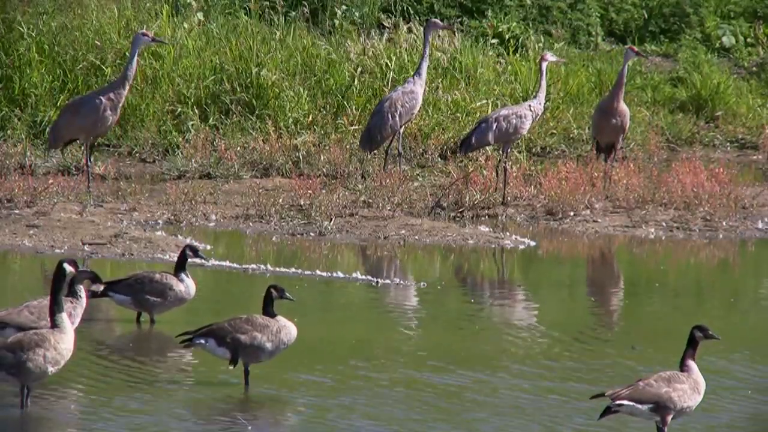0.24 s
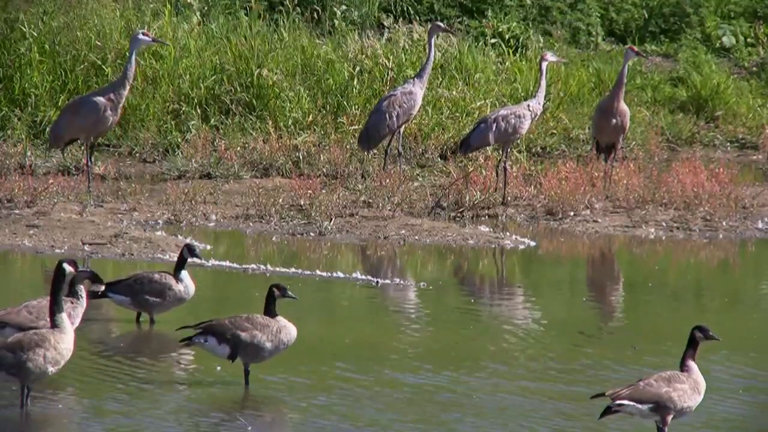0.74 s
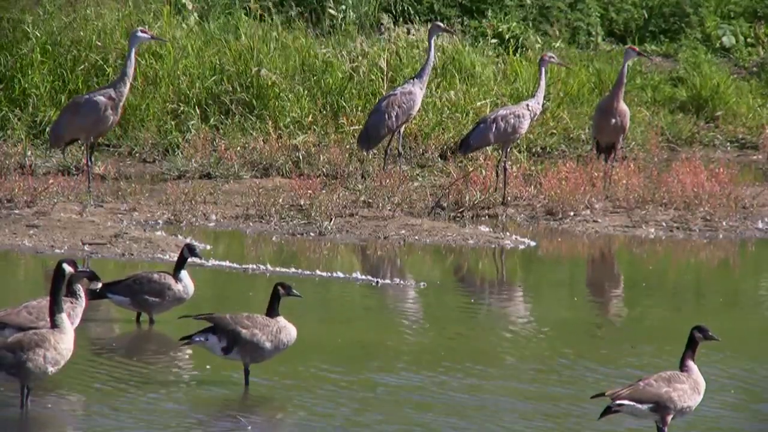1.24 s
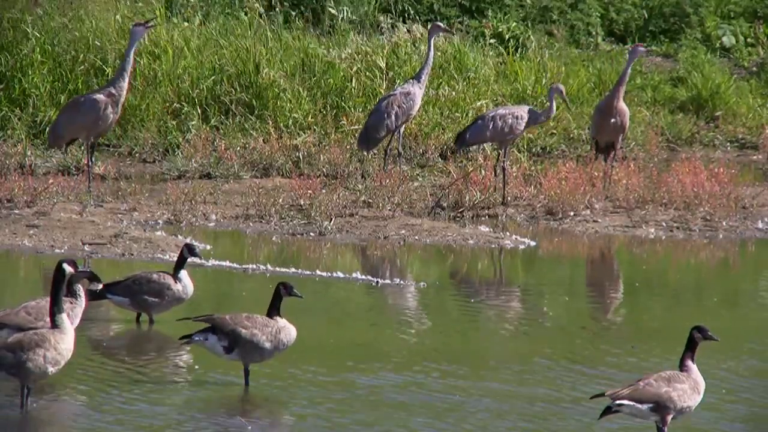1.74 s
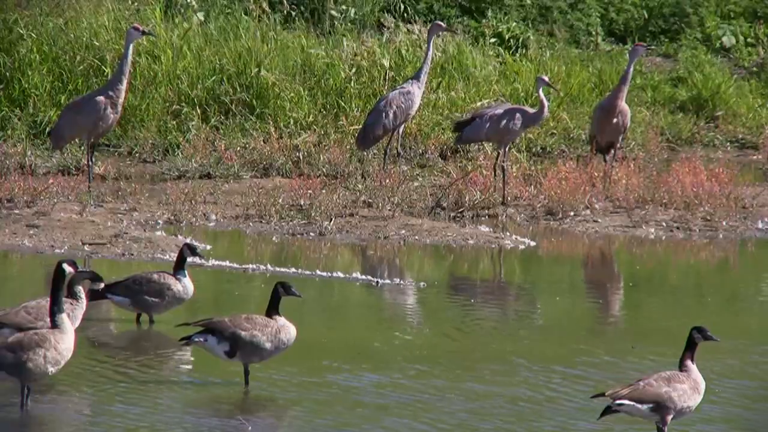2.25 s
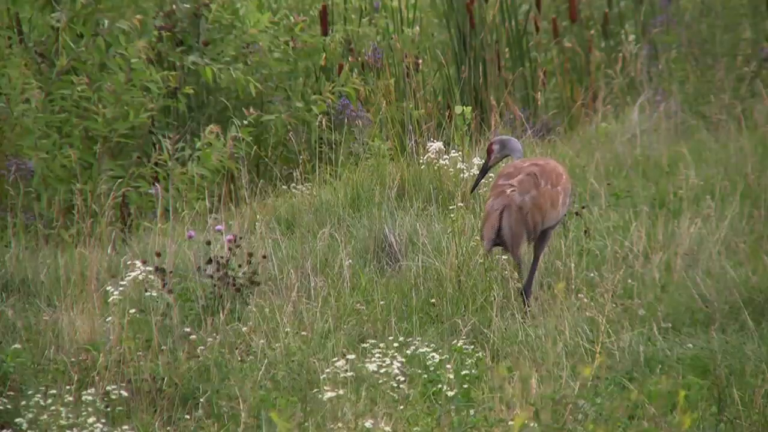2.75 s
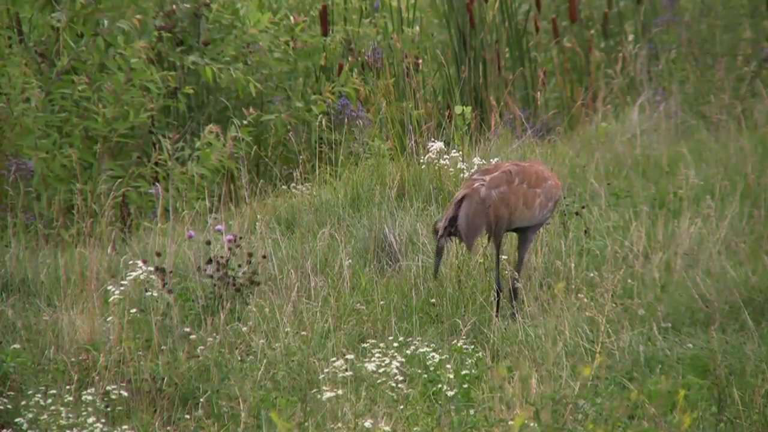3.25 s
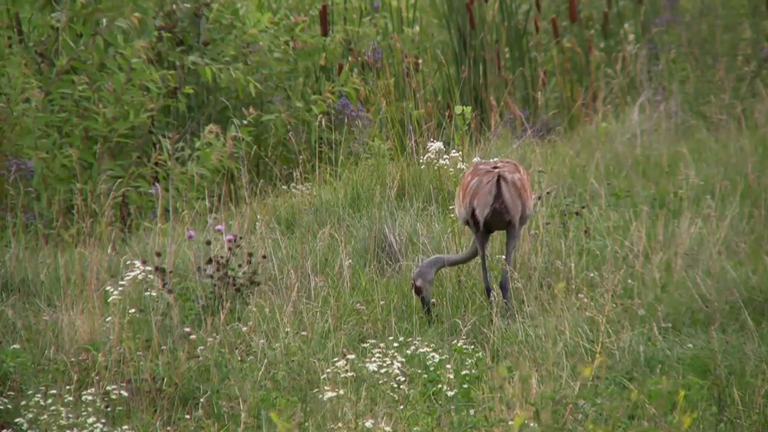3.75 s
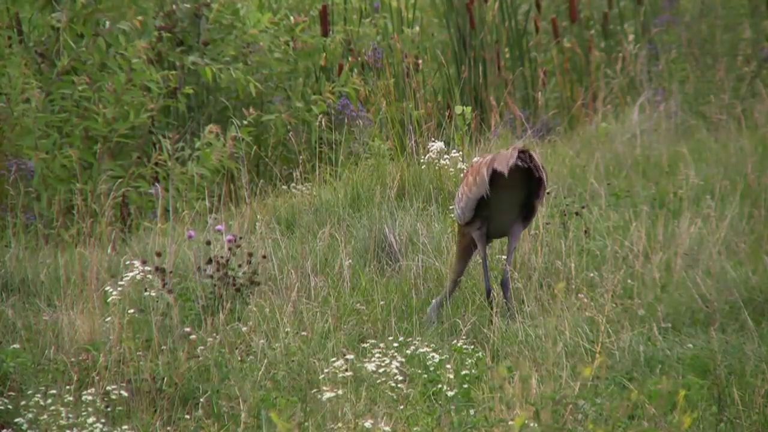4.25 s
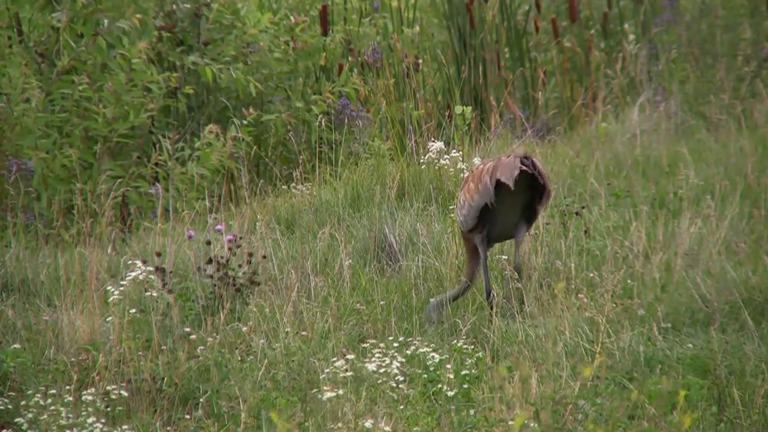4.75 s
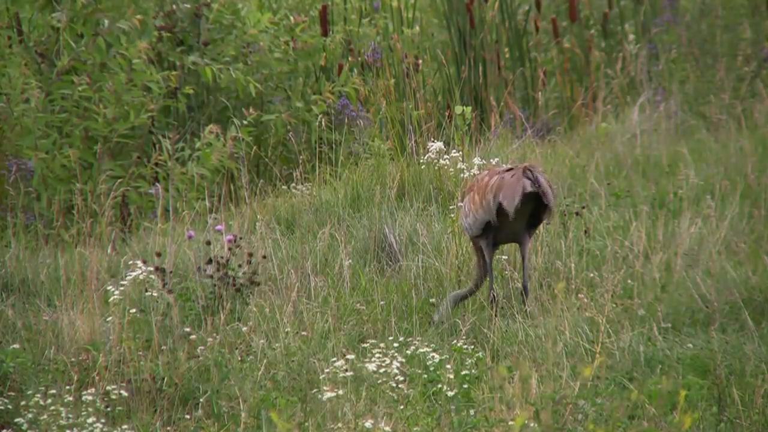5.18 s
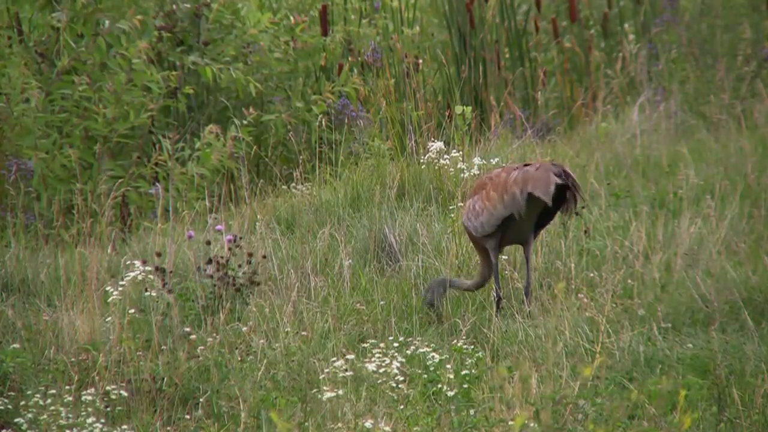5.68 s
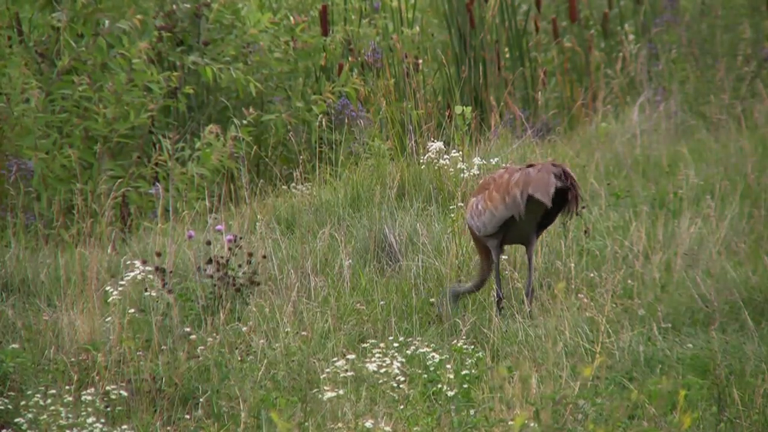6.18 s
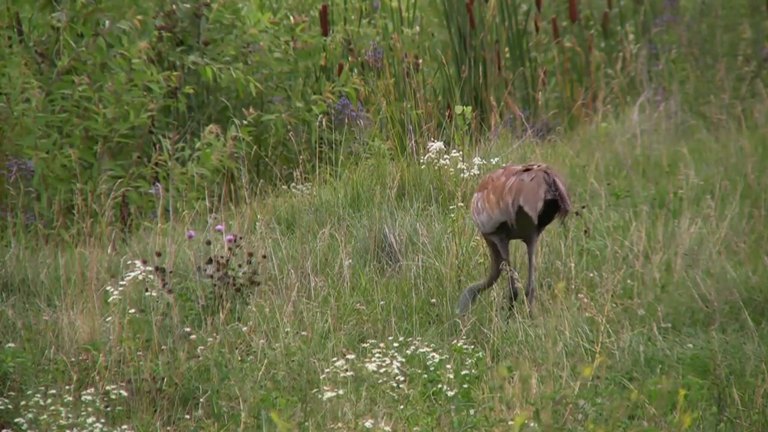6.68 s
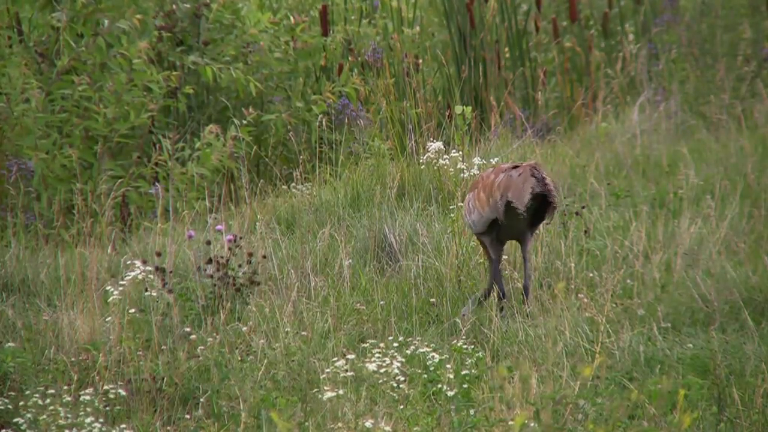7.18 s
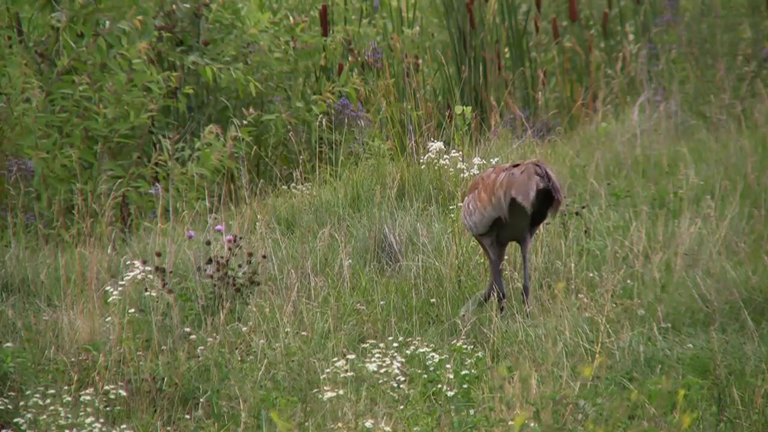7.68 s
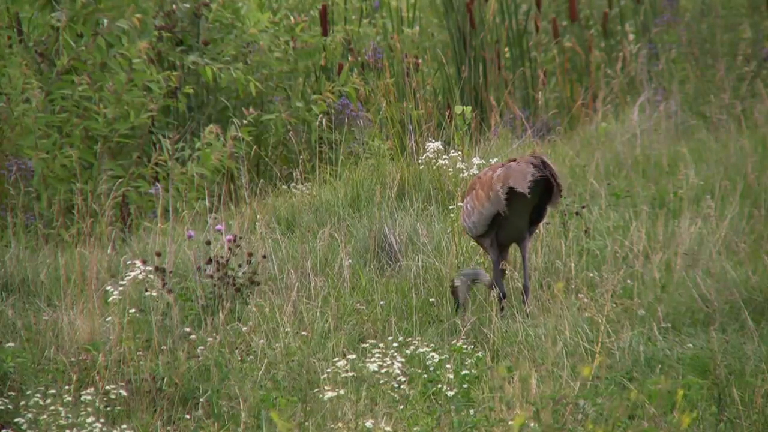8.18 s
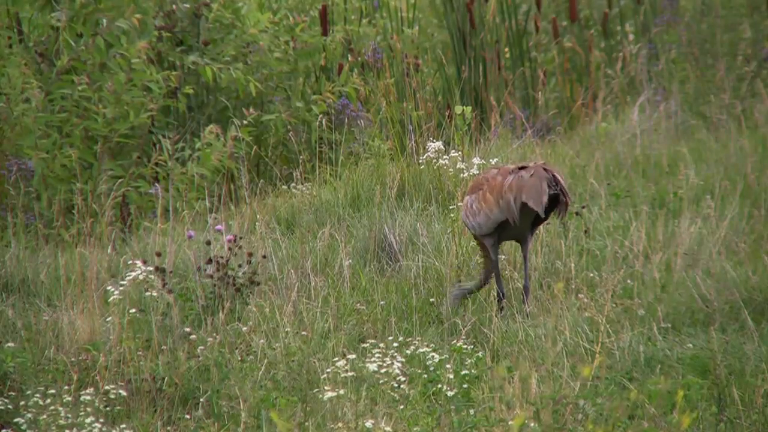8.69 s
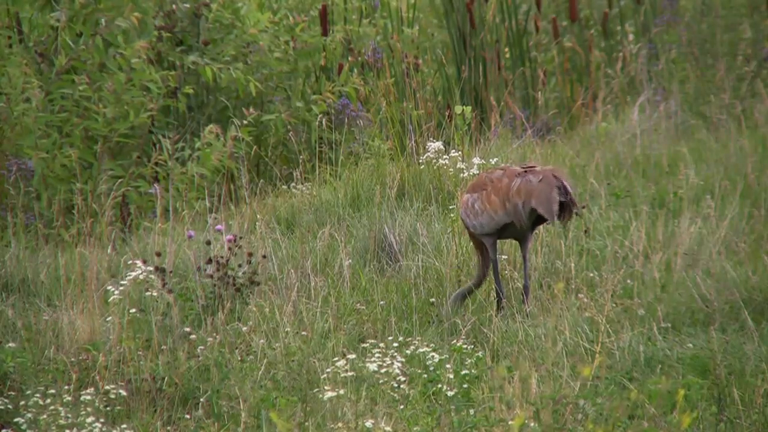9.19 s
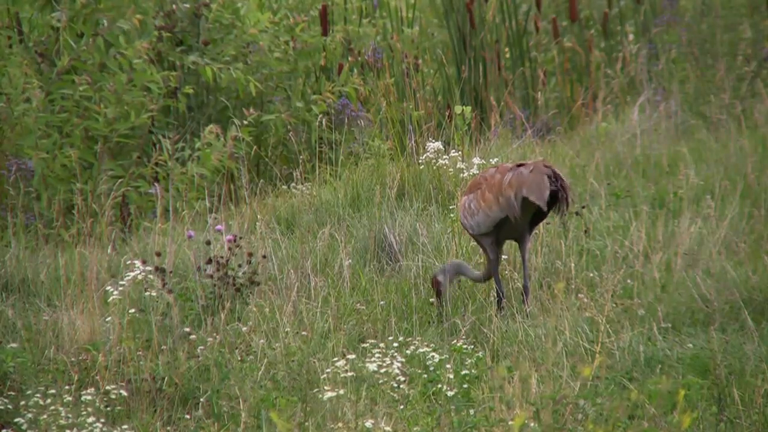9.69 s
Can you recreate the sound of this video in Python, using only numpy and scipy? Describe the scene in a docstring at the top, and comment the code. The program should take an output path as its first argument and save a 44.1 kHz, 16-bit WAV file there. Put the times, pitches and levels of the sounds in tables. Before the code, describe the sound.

Distant waterbird cries, soft wind rumble and quick bird twitters open the scene; honks then lead into a brief loud duet of rattling cranes, centred, with a slight echo off the banks. The pond sound stops suddenly. The remaining seven seconds are quieter: a katydid pulsing about eleven times a second, high insect fizz, small birds whistling, scolding and chipping left and right. Wide open-air stereo pickup in wetland grass, no water splashes.

```python
"""Crane duet with songbirds and a katydid

Two sandhill cranes rattle at a pond after far gull-like cries and honks: gliding harmonics through
a throat response, plus rasp noise. The pond layer stops at 2.6 s; a katydid pulses from 2.4 s on as
gated bright noise. Small birds twitter, whistle (gliding sines) and chip (noise bursts) on both sides
throughout, over insect hiss and far birds (patchy noise), wind, dull noise and faint thin tones."""
import sys
import numpy as np
from scipy import signal
from scipy.fft import rfft, irfft, next_fast_len
from scipy.io import wavfile
from scipy.ndimage import uniform_filter1d, map_coordinates

SR = 44100
rng = np.random.default_rng(int(sys.argv[2]) if len(sys.argv) > 2 else 0)


def transcribe(signal):
    """Save signal, clipped to [-1, 1], as a 16-bit WAV file at the path in sys.argv[1]."""
    frames = np.atleast_2d(signal).T
    limited = np.clip(frames, -1, 1)
    pcm = np.round(limited * 32767).astype(np.int16)
    wavfile.write(sys.argv[1], SR, pcm)


N = 437913
T = np.arange(N) / SR

# rasp noise of cranes and waterbirds: freq_hz, relative_db (per Hz)
RASP_SPECTRUM = [(100, -44), (250, -24.5), (480, -26), (700, -3), (1000, 6.5), (1400, -8.5), (1750, -5),
                 (2500, -13.5), (3200, -23), (5000, -27.5), (12000, -42)]
# bright rasp and fizz noise: freq_hz, relative_db (per Hz)
WING_SPECTRUM = [(5000, -24.5), (8000, -11), (10000, -10.5), (11500, -4.5), (12800, 0), (14200, -9),
                 (15800, -14.5)]


def amp(db):
    """Decibels to gain."""
    return 10 ** (np.asarray(db) / 20)


def unit(x):
    """Scale to rms 1."""
    return x / np.sqrt(np.mean(x ** 2) + 1e-20)


def along(points, hz):
    """Read (Hz, value) points on a log frequency axis."""
    f, v = np.transpose(points)
    return np.interp(np.log(hz + 1), np.log(f + 1), v)


def curves(rows):
    """One value per sample for each column after the time."""
    s, *columns = np.transpose(rows)
    return [np.interp(T, s, column) for column in columns]


def beats(first, last, period):
    """Evenly spaced times from first to last, about one period apart."""
    return np.linspace(first, last, 1 + int(round(abs(last - first) / period)))


def wobble(rate, size):
    """A smooth random curve, rate knots a second."""
    knots = rng.standard_normal(int(size * rate / SR) + 4)
    return map_coordinates(knots, [np.arange(size) * rate / SR])


def filtered(x, response):
    """x times a response of frequency."""
    m = next_fast_len(N + 8192)
    return irfft(rfft(x, m) * response(np.fft.rfftfreq(m, 1 / SR)), m)[..., :N]


def noise(spectrum, channels=1):
    """Coloured noise of rms 1, unrelated between channels."""
    white = rng.standard_normal((channels, N))
    return unit(filtered(white, lambda hz: amp(along(spectrum, hz))))


def patchy(x, depth_db):
    """Give a noise patches of random gain in time and frequency."""
    z = signal.stft(x, nperseg=512)[2]
    field = uniform_filter1d(rng.standard_normal(z.shape), 5, axis=1)
    field = uniform_filter1d(field, 9, axis=2)
    patched = signal.istft(z * amp(depth_db * unit(field)), nperseg=512)[1]
    return unit(patched[:, :N])


def add(track, s, sound):
    """Mix a sound into a track at time s."""
    part = track[..., max(round(s * SR), 0):][..., :sound.shape[-1]]
    part += sound[..., :part.shape[-1]]


def placed(sound, pan_db):
    """Set a sound between left (+) and right (-) at constant power."""
    return unit(amp([[pan_db / 2], [-pan_db / 2]])) * sound


def progress(length):
    """0 to 1 across a note."""
    return np.linspace(0, 1, max(int(length * SR), 16))


def arch(u, start, middle, end):
    """A pitch curve through three points."""
    return np.polyval(np.polyfit([0, .5, 1], [start, middle, end], 2), u)


def swell(u, power):
    """A rounded rise and fall of rms 1."""
    return unit(np.abs(np.sin(np.pi * u)) ** power)


def echo(x, t60, channels=1):
    """Diffuse answer of banks and bushes: decaying noise with a soft onset."""
    t = np.arange(SR // 2) / SR
    decay = amp(-60 * t / t60) * (1 - np.exp(-t / .0074))
    tail = rng.standard_normal((channels, len(t))) * decay
    return signal.fftconvolve(np.atleast_2d(x), tail / np.linalg.norm(tail[0]), axes=1)[:, :N]


def background():
    """Wind and dull low noise in the middle; breeze, far birds and insects spread wide, all noise."""
    # wind rumble: time_s, level_db
    gusts = [(0, -54.5), (.55, -54), (.8, -57.5), (1.35, -62.5), (1.5, -59.5), (1.69, -60.5), (1.76, -81),
             (2.6, -86), (2.7, -106), (9.93, -117)]
    # freq_hz, relative_db (per Hz)
    rumble_spectrum = [(15, -38.5), (25, -9), (53, 0), (98, 3), (227, -9), (325, -22.5), (532, -20.5),
                       (600, -18.5), (780, -28), (1320, -120)]
    # dull low noise around the loud calls: time_s, level_db
    dull_noise_level = [(1.51, -100), (1.535, -56.5), (1.62, -54.5), (1.75, -62), (2.2, -55), (2.58, -62),
                        (2.6, -100)]
    # freq_hz, relative_db (per Hz)
    dull_noise_spectrum = [(100, -19.5), (250, -2.5), (400, -1), (700, -5.5), (1500, -10), (3000, -22.5)]
    # freq_hz, relative_db (per Hz)
    breeze_spectrum = [(10, -39), (28, -6), (45, 1), (70, 5), (100, -8), (140, -18), (230, -1.5),
                       (400, -3.5), (1000, -2.5), (1900, -3), (4000, -17.5)]
    # far birds: time_s, level_db
    chorus_level = [(0, -47), (2.2, -46.5), (3.5, -48), (5.4, -49.5), (6.6, -45.5), (7, -49), (8, -46),
                    (8.6, -49.5), (9.15, -51), (9.93, -46)]
    # freq_hz, relative_db (per Hz)
    chorus_spectrum = [(1500, -36.5), (2100, -10), (2700, 2), (3600, 2.5), (5000, 5), (6000, -8.5),
                       (7000, -26)]
    # insect hiss: freq_hz, relative_db (per Hz)
    insect_spectrum = [(3290, -29), (5600, -9), (5950, -12.5), (6140, -2.5), (6430, 1), (6950, -7),
                       (7280, -1.5), (7570, 3.5), (9100, -20), (10000, -19.5), (13000, -45), (22000, -120)]
    # high insect fizz: time_s, level_db
    fizz_level = [(0, -63.5), (1.5, -62.5), (2.3, -57), (4, -56), (6.6, -51.5), (7.7, -48), (8.4, -53.5),
                  (9.15, -58), (9.5, -51), (9.93, -53)]

    rumble = amp(curves(gusts)[0] + 1.5 * wobble(7, N)) * noise(rumble_spectrum)
    dull_noise = amp(curves(dull_noise_level)[0] + 2 * wobble(25, N)) * noise(dull_noise_spectrum)
    breeze = noise(breeze_spectrum) + amp(1) * noise(breeze_spectrum, channels=2)
    breeze = amp(-71 + 1.2 * wobble(5.7, N)) * breeze
    birds = patchy(noise(chorus_spectrum, channels=2), depth_db=5.0)
    birds = amp(curves(chorus_level)[0] + .6 * wobble(3, N)) * birds
    insects = patchy(noise(insect_spectrum, channels=2), depth_db=3.0)
    insects = amp(-46.3 + .7 * wobble(25, N)) * insects
    fizz = amp(curves(fizz_level)[0]) * noise(WING_SPECTRUM, channels=2)
    return rumble + dull_noise + breeze + birds + insects + fizz


def thin_tones():
    """Faint thin tones that come and go: sines of randomly wavering level and phase."""
    # start_s, end_s, pitch_hz, level_db (before the wavering)
    tones = [(0, 2, 540, -66), (0, 2.2, 362, -74), (0, 1.84, 242, -68.5), (2.6, 9.1, 758, -77.5)]
    out = np.zeros(N)
    for start, end, hz, db in tones:
        held = np.clip(np.minimum(T - start, end - T) / .05, 0, 1)
        tone = np.sin(2 * np.pi * hz * T + wobble(2.9, N))
        out += held * amp(db) * np.abs(wobble(6, N)) * tone
    return out


def katydid(stroke_s, attack_s, tail_db, tail_s, scatter_db):
    """Each pulse is a bright rasp of noise that starts fast and trails off softly."""
    # runs of bright rasps; the run near 8 s is treble of the scolding notes:
    # first_s, last_s, period_s
    runs = [(2.408, 3.406, .1), (3.486, 5.79, .0885), (5.856, 5.856, .09), (5.972, 7.75, .086),
            (7.83, 8.155, .08), (8.24, 8.856, .102), (8.975, 9.325, .116), (9.4, 9.555, .078),
            (9.67, 9.9, .115)]
    # time_s, drive_db (before the noise gains)
    drive = [(2.4, -35.5), (3.3, -33), (3.8, -35), (4.45, -30.5), (5.4, -37.5), (6.15, -34), (7, -41),
             (7.7, -39), (7.9, -33), (8.4, -39), (9.1, -32), (9.93, -31)]
    force = np.zeros(N)
    t = np.arange(SR // 8) / SR
    body = np.exp(-(t / stroke_s) ** 4)
    tail = amp(tail_db) * np.exp(-t / tail_s)
    shape = (1 - np.exp(-t / attack_s)) * (body + tail)
    for run in runs:
        for s in beats(*run):
            add(force, s - attack_s, amp(scatter_db * rng.standard_normal()) * shape)
    teeth = amp(curves(drive)[0] + 1.5 * wobble(900, N))
    rasp = amp(-16.5) * noise(WING_SPECTRUM) + amp(-10) * noise(WING_SPECTRUM, channels=2)
    return force * teeth * rasp


def twitter(bouts, hz, gap_s, pan_db):
    """A bird repeats three quick drooping sine notes: a weak low one, then two full ones."""
    # notes of a phrase: length_s, pitch_ratio, relative_db
    phrase = [(.017, .975, -2.5), (.023, 1, 0), (.023, 1, .5)]
    period_s = .295
    out = np.zeros((2, N))
    for first, last, db in bouts:
        for s in beats(first, last, period_s):
            phrase_hz = hz * (1 + .005 * rng.standard_normal())
            for k, (length, ratio, note_db) in enumerate(phrase):
                u = progress(length)
                pitch = phrase_hz * ratio * arch(u, 1.02, 1.012, .96)
                tone = np.sqrt(2) * np.sin(2 * np.pi * np.cumsum(pitch) / SR)
                note = amp(db + note_db) * swell(u ** 1.4, .61) * tone
                add(out, s + (k - 1) * gap_s - length / 2, placed(note, pan_db))
    return out


def whistle(length, hz, bend, db, pan_db, jitter=.007):
    """A nearly pure gliding, trembling note that weakens as its pitch drops below hz."""
    u = progress(length)
    pitch = hz * arch(u, *bend) * (1 + jitter * wobble(900, len(u)))
    flutter_db = 1.8 * wobble(150, len(u))
    phase = 2 * np.pi * np.cumsum(pitch) / SR
    third = np.sin(3 * phase) * (3 * pitch < SR / 2)  # no aliasing
    tone = np.sin(phase) + amp(-28) * np.sin(2 * phase) + amp(-25) * third
    shape = unit(swell(u, .4) * np.minimum(pitch / hz, 1) ** 3)
    return placed(amp(db + 1.0 + flutter_db) * shape * tone, pan_db)


def chirps():
    """Single whistled calls; every kind has its own bend (pitch ratio at start, middle, end)."""
    # levels here are nominal: whistle() adds its own trim
    # steep falling calls: start_s, length_s, pitch_hz, level_db, left_right_db
    falls = [(4.278, .031, 4280, -38, 7), (4.394, .05, 4450, -35.5, 8), (4.417, .033, 3530, -42, 9),
             (4.498, .07, 3340, -44.5, 11), (4.628, .072, 3120, -44.5, 8), (5.293, .051, 3026, -44, 21.5),
             (6.043, .037, 3900, -32.5, 20), (6.07, .05, 2800, -48, 20), (6.283, .051, 4430, -32.5, 9),
             (6.392, .051, 3330, -38.5, 8), (6.507, .059, 3280, -42.5, 8), (8.186, .024, 5950, -26, -29),
             (8.223, .035, 4200, -36.5, -21), (8.289, .032, 4400, -37.5, -21), (8.47, .042, 3910, -48, 6),
             (9.097, .019, 4680, -39, -9), (9.325, .019, 4210, -44, -5.5), (9.556, .02, 4360, -41, -8)]
    # rising calls: start_s, length_s, pitch_hz, level_db, left_right_db
    rises = [(2.882, .086, 3210, -40.5, -5.5), (3.082, .07, 3075, -40.5, -5), (4.053, .046, 6000, -41, -4),
             (4.763, .066, 3450, -46, 21), (5.697, .066, 3964, -34.5, 28), (5.819, .06, 4120, -33, 26),
             (8.141, .023, 4650, -26, -24)]
    # slow drooping whistles of one bird on the left: start_s, level_db
    droops = [(-.02, -42), (.29, -46), (1.05, -41), (1.68, -43), (2.135, -42), (2.885, -41), (3.747, -45.5),
              (5.17, -45), (6.125, -39), (6.425, -45.5), (7.694, -47), (8.02, -42), (8.69, -47),
              (8.993, -44.5), (9.779, -40.5)]
    # arched calls: start_s, pitch_hz, level_db, left_right_db
    peeps = [(2.73, 5200, -40.5, -4), (4.455, 4520, -39.5, 5.5), (5.266, 3560, -41, 25),
             (6.08, 5690, -38, 10), (6.756, 4620, -35.5, -24), (7.848, 4280, -31, 10),
             (9.258, 4610, -36, -29)]
    out = np.zeros((2, N))
    for calls, bend, jitter in (falls, (1.23, 1, .78), .026), (rises, (.85, 1, 1.13), .012):
        for s, length, hz, db, pan_db in calls:
            add(out, s, whistle(length, hz, bend, db, pan_db, jitter))
    for s, db in droops:
        hz = 4720 * (1 + .012 * rng.standard_normal())
        add(out, s, whistle(.093, hz, (1.06, 1, .88), db, pan_db=6))
    for s, hz, db, pan_db in peeps:
        add(out, s, whistle(.047, hz, (.97, 1, .91), db, pan_db))
    return out


def series():
    """Whistles repeated at an even pace; pips and scolds sink in pitch and level as they go."""
    # levels here are nominal: whistle() adds its own trim
    # parts of a scold: delay_s, length_s, pitch_hz, start_ratio, end_ratio, level_db
    scold_parts = [(0, .015, 4230, .93, .98, -18), (.012, .017, 3130, 1.08, .7, -30)]
    # faint low far whistles: first_s, last_s
    far_runs = [(7.025, 7.68), (9.532, 9.744)]
    out = np.zeros((2, N))
    for k, s in enumerate(beats(first=3.404, last=3.948, period=.09)):
        add(out, s, whistle(.021, 2970 - 42 * k, (.82, 1, .79), -39 - 1.3 * k, pan_db=-6))
    for k, s in enumerate(beats(first=7.819, last=8.056, period=.079)):
        for delay, length, hz, start, end, db in scold_parts:
            part = whistle(length, hz - 125 * k, (start, 1, end), db - 1.6 * k, pan_db=-24)
            add(out, s + delay, part)
    for first, last in far_runs:
        for s in beats(first, last, period=.217):
            hz = 1670 * (1 + .02 * rng.standard_normal())
            add(out, s, whistle(.06, hz, (1.06, 1, .95), db=-66, pan_db=-12))
    return out


def chips():
    """Toneless hard notes, single or in uneven bursts of ticks: swells of coloured noise."""
    # single chips: start_s, length_s, level_db, left_right_db
    singles = [(4.06, .02, -37.5, -5), (6.052, .0074, -29.5, 23), (7.154, .017, -28.5, -20),
               (7.374, .016, -28.5, -21.5), (7.595, .017, -26, -19), (9.661, .016, -27.5, -30),
               (9.881, .015, -28, -17)]
    # bursts of ticks: first_s, last_s, period_s, level_db, left_right_db
    tick_bursts = [(6.877, 6.949, .012, -35, -7), (8.743, 8.879, .04, -39, -9),
                   (9.386, 9.457, .012, -33.5, -14)]
    # freq_hz, relative_db (per Hz)
    chip_spectrum = [(100, -26), (2000, -29), (3000, -18.5), (4200, -5.5), (6300, 4), (7500, -13),
                     (9500, -14), (13000, -9), (16000, -20)]
    tick_s = .0055
    force = np.zeros((2, N))
    for s, length, db, pan_db in singles:
        add(force, s, placed(amp(db) * swell(progress(length), 1.1), pan_db))
    for first, last, period, db, pan_db in tick_bursts:
        for s in beats(first, last, period):
            late, louder = rng.standard_normal(2)
            tick = amp(db + 1.5 * louder) * swell(progress(tick_s), 1.1)
            add(force, s + .15 * period * late, placed(tick, pan_db))
    return force * noise(chip_spectrum)


def dull_ticks(calls):
    """Faint dull noise under the calls, following their short-term rms."""
    # freq_hz, relative_db (per Hz)
    dull_tick_spectrum = [(100, -6), (250, 0), (700, -2), (1600, -4), (3000, -12), (9000, -20)]
    power = uniform_filter1d(np.mean(calls ** 2, axis=0), size=220)  # 5 ms
    return amp(-37.5) * np.sqrt(np.abs(power)) * noise(dull_tick_spectrum)


def voiced(pitch, throat, jitter, count=12):
    """Harmonics of an unsteady syrinx, each weighted by the throat as it glides."""
    pitch = pitch * (1 + jitter * wobble(700, len(pitch)))
    k = np.arange(1, count + 1)[:, None]
    phase = 2 * np.pi * k * np.cumsum(pitch) / SR
    return np.sqrt(2) * np.sum(amp(along(throat, k * pitch)) * np.sin(phase), axis=0)


def waterbird(calls, bend, throat, jitter, softness, waver, hoarse_db):
    """Arched nasal calls, hoarse at first then clear; any low-pitched rows act as subharmonics."""
    tone, force = np.zeros(N), np.zeros(N)
    for s, length, hz, db in calls:
        u = progress(length)
        pitch = hz * arch(u, *bend) * (1 + waver * wobble(30, len(u)))
        shape = amp(db) * swell(u, softness)
        add(tone, s, shape * voiced(pitch, throat, jitter))
        add(force, s, shape * (1 - u))
    return tone + amp(hoarse_db) * force * noise(RASP_SPECTRUM)[0]


def crane(notes, start_hz, end_hz, throat, attack_s, fade, sag, full_s, jitter,
          flutter_db, rasp_db, snap_db):
    """A rattle: notes snap on, sag and fade, raspiest early; those shorter than full_s sag less."""
    tone, force = np.zeros(N), np.zeros(N)
    for s, length, db in notes:
        u = progress(length)
        depth = min(length / full_s, 1) ** 4
        pitch = start_hz - (start_hz - end_hz) * depth * (1 - (1 - u) ** sag)
        pitch = pitch * (1 + .015 * rng.standard_normal())
        shape = (1 - np.exp(-(u * length / attack_s) ** 2)) * (1 - u ** fade)
        shape = shape * amp(db + flutter_db * wobble(296, len(u)))
        add(tone, s, shape * voiced(pitch, throat, jitter, count=7))
        add(force, s, shape * amp(snap_db * (2 - u)))
    return tone + amp(rasp_db) * force * noise(RASP_SPECTRUM)[0]


def pond():
    """Cranes, waterbirds, their echoes and pond air, all in the middle, stopping at end_s."""
    # rattle notes of the lower and the higher crane: start_s, length_s, level_db (before throat)
    low_notes = [(1.77, .036, -9.5), (1.842, .031, -9.5), (1.904, .03, -11), (1.962, .032, -11),
                 (2.007, .01, -7), (2.015, .024, -7), (2.066, .023, -9.5), (2.083, .026, -14),
                 (2.118, .024, -9), (2.138, .027, -15), (2.166, .022, -11), (2.195, .026, -14),
                 (2.215, .028, -15), (2.249, .027, -13.5), (2.298, .027, -14.5), (2.352, .026, -14.5),
                 (2.399, .027, -18), (2.448, .03, -19)]
    high_notes = [(1.932, .008, -13.5), (1.939, .025, -9), (1.999, .019, -13), (2.058, .016, -11.5),
                  (2.112, .009, -9), (2.165, .03, -13), (2.217, .032, -14), (2.268, .024, -16),
                  (2.291, .011, -13.5), (2.319, .028, -15), (2.346, .008, -16.5), (2.399, .027, -19.5),
                  (2.449, .027, -19), (2.499, .025, -17), (2.547, .031, -19)]
    # windpipe responses: freq_hz, gain_db
    low_throat = [(500, -12.5), (800, -3), (980, -1), (1300, -11.5), (1700, -17), (2100, -25),
                  (2500, -27.5), (3300, -36), (4400, -35), (8000, -54.5)]
    high_throat = [(700, -2), (950, 1.5), (1080, -3), (1300, -16), (1900, -24), (2300, -15), (2600, -17),
                   (3100, -34.5), (3950, -23.5), (4600, -39.5), (8000, -52.5)]
    # calls: start_s, length_s, pitch_hz, level_db (before throat)
    honk_calls = [(1.625, .05, 535, -37), (1.636, .082, 579, -29.5), (1.815, .072, 695, -36),
                  (1.868, .09, 587, -35)]
    cry_calls = [(0, .06, 232, -54), (.08, .11, 312, -52), (.12, .08, 775, -50), (.24, .11, 875, -51),
                 (.29, .13, 187, -60), (.46, .15, 785, -47), (.5, .15, 259, -52), (.57, .22, 196, -57),
                 (.77, .08, 860, -44), (.79, .098, 309, -51), (.86, .094, 430, -49.5),
                 (.94, .12, 838, -42.5), (1.02, .07, 392, -58), (1.245, .18, 915, -49.5)]
    # throat responses: freq_hz, gain_db
    honk_throat = [(500, -17.5), (700, -12), (1000, -0.5), (1200, -6.5), (1450, -22), (1730, 0),
                   (2300, -20), (2900, -17), (3500, -25), (6000, -31.5), (9000, -44)]
    cry_throat = [(300, -29), (600, -19), (820, -2.5), (1100, -1), (1650, 1), (2100, -5.5), (2600, -15.5),
                  (3500, -23), (6000, -39.5)]
    # freq_hz, relative_db (per Hz)
    air_spectrum = [(150, -8.5), (260, 1), (400, -5), (540, -0.5), (650, -5), (850, 7), (1500, -4.5),
                    (2500, -7.5), (5000, -21)]
    end_s, fade_s = 2.597, .0028

    air = amp(-62) * noise(air_spectrum)
    # bend: pitch ratio at start, middle, end
    cries = waterbird(cry_calls, (.91, 1, .88), cry_throat,
                      jitter=.014, softness=.8, waver=.02, hoarse_db=-9)
    honks = waterbird(honk_calls, (.96, 1, 1), honk_throat,
                      jitter=.014, softness=.6, waver=.005, hoarse_db=-3)
    cranes = crane(low_notes, 965, 763, low_throat, attack_s=.0025, fade=1.6, sag=2.1, full_s=.012,
                   jitter=.024, flutter_db=1.5, rasp_db=-20, snap_db=4)
    cranes += crane(high_notes, 1295, 935, high_throat, attack_s=.002, fade=2.5, sag=2.5, full_s=.025,
                    jitter=.03, flutter_db=1.7, rasp_db=-22.5, snap_db=6)
    near = cranes + honks
    banks = amp(-22) * echo(near, t60=.45) + amp(-8.5) * echo(cries, t60=.44)
    return (near + cries + banks + air) * np.clip((end_s - T) / fade_s, 0, 1)


def scene():
    """Air and insects, songbirds in the bushes, and the pond."""
    # bouts of the two twittering birds: first_phrase_s, last_phrase_s, level_db
    low_bouts = [(.087, .665, -38.5), (1.18, 1.486, -38), (1.905, 2.508, -40), (3.005, 3.282, -40),
                 (3.65, 4.258, -42), (4.508, 6.003, -40), (6.41, 7.011, -39.5), (7.397, 7.652, -40),
                 (8.52, 8.52, -41)]
    high_bouts = [(.248, .794, -44), (1.383, 1.383, -44), (1.62, 3.013, -43.5), (3.392, 3.984, -44.5),
                  (6.333, 8.397, -40.5), (8.78, 9.067, -43), (9.513, 9.726, -44)]
    insect = katydid(stroke_s=.026, attack_s=.0045, tail_db=-12, tail_s=.045, scatter_db=1.7)
    twitters = twitter(low_bouts, hz=4700, gap_s=.038, pan_db=-2.5)
    twitters += twitter(high_bouts, hz=5460, gap_s=.032, pan_db=12)
    calls = chirps() + series() + chips()
    songbirds = twitters + calls
    bushes = amp(-14) * echo(songbirds, t60=.09, channels=2)
    bushes += amp(-24) * echo(songbirds, t60=.5, channels=2)
    return background() + thin_tones() + insect + songbirds + dull_ticks(calls) + bushes + pond()


def record(dry):
    """Remove everything above the band limit."""
    top_hz = 15800
    return filtered(dry, lambda hz: hz < top_hz)


dry = scene()
out = record(dry)
transcribe(out)
```